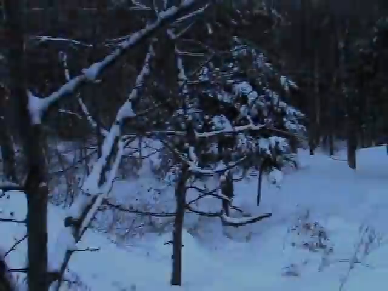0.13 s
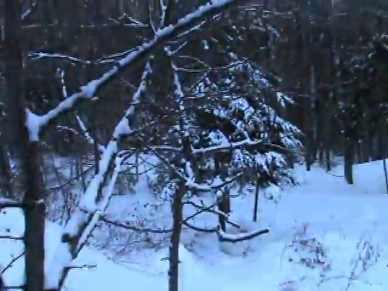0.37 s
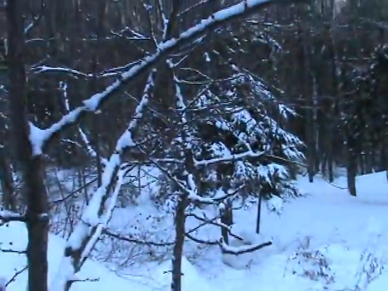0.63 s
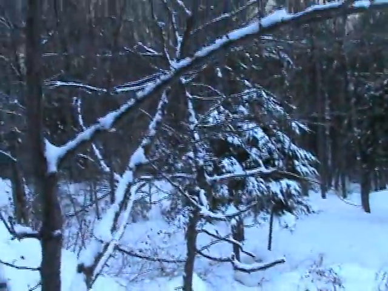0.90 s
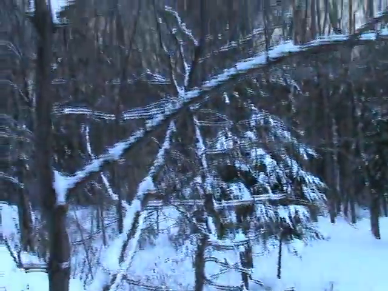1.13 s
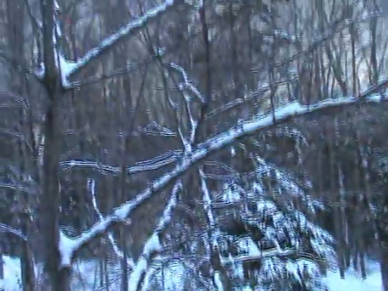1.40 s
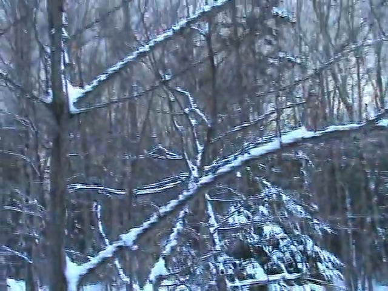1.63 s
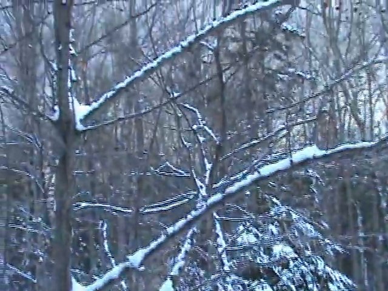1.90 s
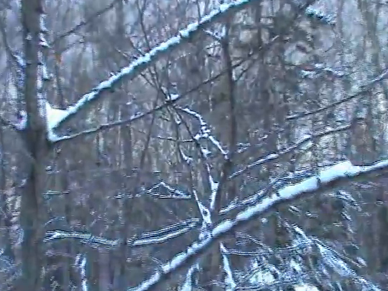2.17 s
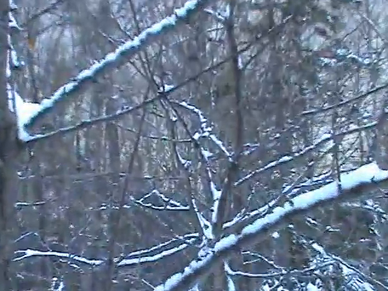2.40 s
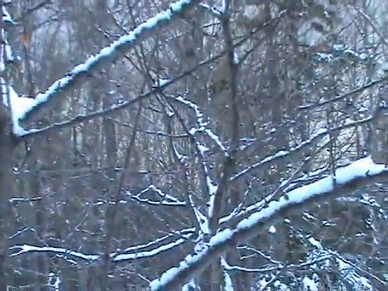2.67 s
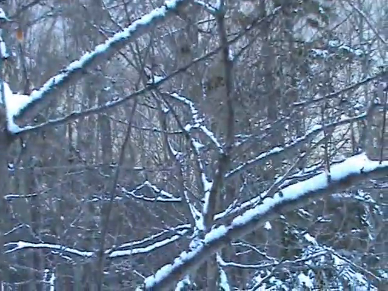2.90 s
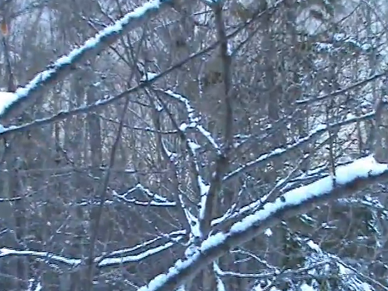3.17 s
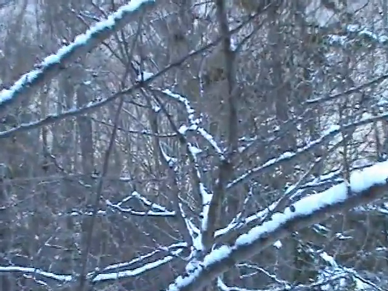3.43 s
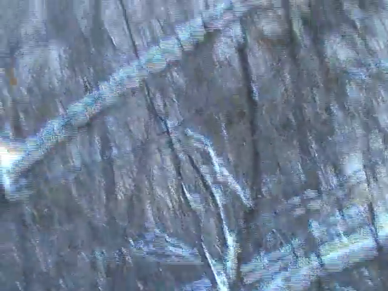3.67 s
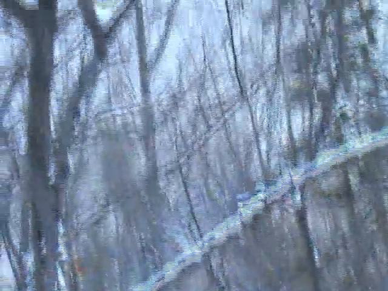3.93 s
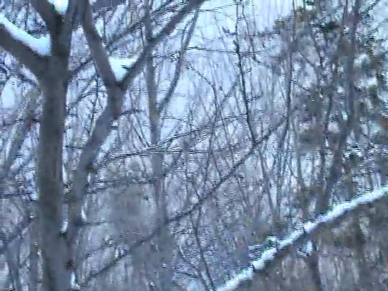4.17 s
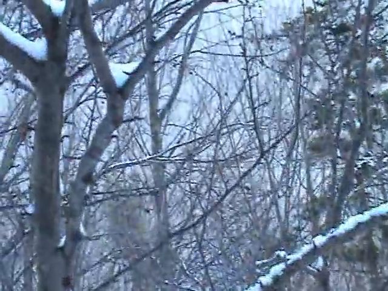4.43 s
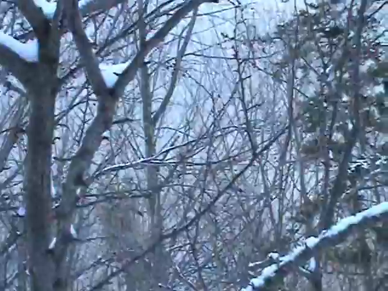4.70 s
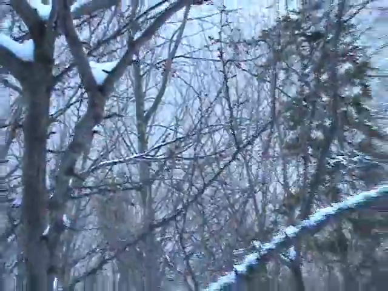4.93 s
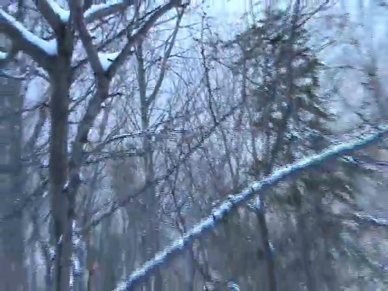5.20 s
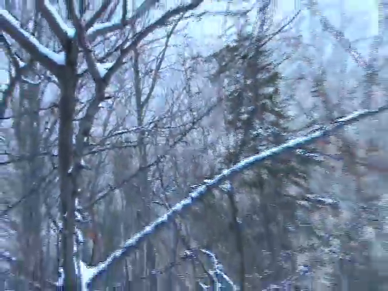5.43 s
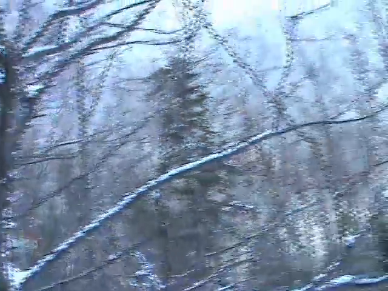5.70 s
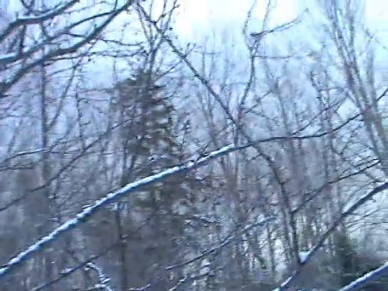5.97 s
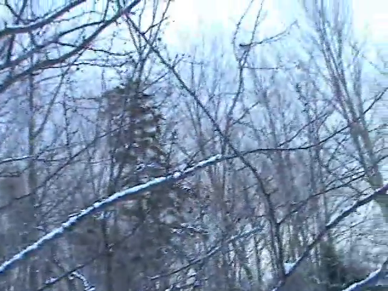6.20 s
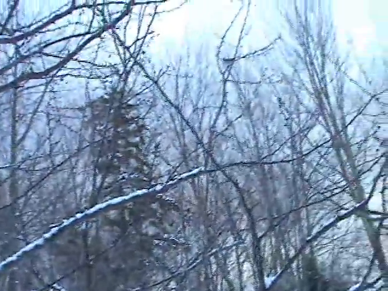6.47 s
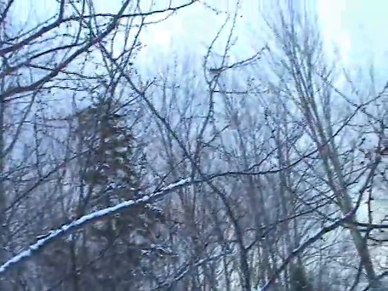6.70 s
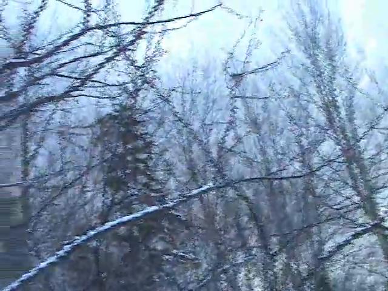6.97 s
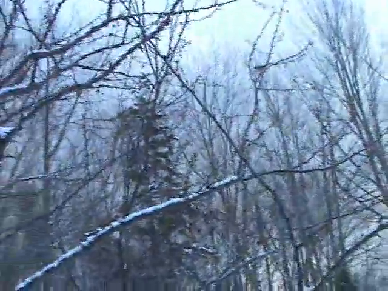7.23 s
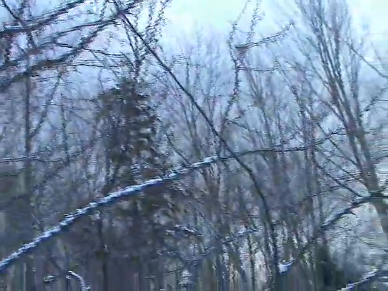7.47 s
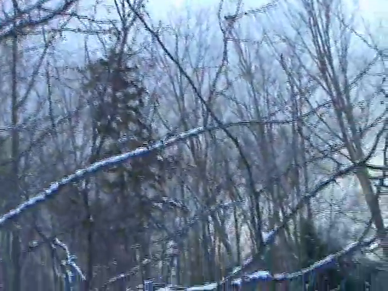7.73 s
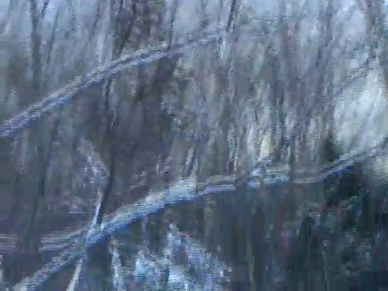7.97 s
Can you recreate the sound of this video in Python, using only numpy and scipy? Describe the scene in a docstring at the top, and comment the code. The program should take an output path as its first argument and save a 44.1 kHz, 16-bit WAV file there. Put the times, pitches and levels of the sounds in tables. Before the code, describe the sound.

A few small songbirds call in open winter woodland with a short, faint scatter of reflections from trees. Their tiny rising chips are mostly faint, some sharp and close, with one raspy phrase near the middle. Right at the microphone, fabric slides, the camera body knocks dully, metal clicks, and plastic ticks, busiest in the first five seconds. Underneath are bassy hand tremble, low outdoor air, a faint steady whine, wavering hum and distant engine drone.

```python
"""Songbirds and a handheld camera in snowy woods

Small birds give rising chips, lower falling notes and one buzzy phrase, all two-voiced: paired oscillators with
mixed tones. Close by, cloth rustles (clumped noise), the camera body knocks and a small metal part clinks
(struck modes), dry ticks snap (noise bursts), and soft bumps and the hand's tremble push the bass about. A far
gliding drone, a wavering hum, steady whines and outdoor air with camera hiss lie underneath."""
import sys
import numpy as np
from scipy import signal
from scipy.fft import rfft, irfft, next_fast_len
from scipy.io import wavfile
from scipy.ndimage import map_coordinates

SR = 44100
rng = np.random.default_rng(int(sys.argv[2]) if len(sys.argv) > 2 else 0)


def bounce(signal):
    """Save signal as a 16-bit WAV file at the path given by the first command-line argument."""
    frames = np.transpose(np.atleast_2d(signal))
    limited = np.clip(frames, -1, 1)
    pcm = np.round(limited * 32767).astype(np.int16)
    wavfile.write(sys.argv[1], SR, pcm)


def voltage_ratio(decibels):
    """Convert decibels (scalar or array-like) to amplitude ratios, 20 dB per decade."""
    exponent = np.asarray(decibels, float) / 20
    return 10 ** exponent


N = 357651  # samples


def unit(x):
    """Normalisation: scales a signal to rms 1."""
    return x / np.sqrt(np.mean(x ** 2) + 1e-20)


def along(points, hz):
    """Logarithmic frequency scale: interpolates (Hz, value) points on it."""
    f, v = np.transpose(points)
    return np.interp(np.log(hz + 1), np.log(f + 1), v)


def curves(rows, t):
    """Linear interpolation: reads each column after the time column at t."""
    s, *columns = np.transpose(rows)
    return [np.interp(t, s, column) for column in columns]


def wobble(rate, size=N):
    """Band-limited random modulation: a smooth curve through rate random knots a second."""
    knots = rng.standard_normal(int(size * rate / SR) + 4)
    return map_coordinates(knots, [np.arange(size) * rate / SR])


def filtered(x, response):
    """Linear filtering: multiplies the spectrum of x by a response of frequency."""
    m = next_fast_len(x.shape[-1] + 8192)
    return irfft(rfft(x, m) * response(np.fft.rfftfreq(m, 1 / SR)), m)[..., :x.shape[-1]]


def resonances(table):
    """Damped resonance: causal response of (Hz, width Hz, dB) resonators summed with alternating sign."""
    def response(f):
        return sum((-1) ** k * voltage_ratio(db) * 1j * f * width / (hz * hz - f * f + 1j * f * width)
                   for k, (hz, width, db) in enumerate(table))
    return response


def add(out, s, x, pan_db):
    """Stereo level difference: places x at time s, left louder than right by pan_db."""
    i = round(s * SR)
    out[:, i:i + len(x)] += (x * voltage_ratio([[pan_db / 2], [-pan_db / 2]]))[:, :N - i]


def phase(hz):
    """Phase is the integral of frequency: running phase of a pitch curve from a random start."""
    return 2 * np.pi * (np.cumsum(hz) / SR + rng.random())


LOW_VOICE_HZ = 3904
# Tones of the two voices together. Each row: multiple of the high pitch, multiple of the low pitch.
MIXES = [(1, 0), (0, 1), (1, -1), (1, 1), (2, 0), (1, 2), (2, -1), (-1, 3), (-1, 4)]


def voices(high, low, levels_db, swell):
    """Nonlinear mixing: both sides of the syrinx sound at once, with sum and difference tones and rasping air."""
    tones = 0
    for k, ((a, b), db) in enumerate(zip(MIXES, levels_db)):
        growth = swell ** (1 + 0.08 * (k > 0))  # all but the high voice grow faster
        tones = tones + voltage_ratio(db) * growth * np.sin(a * high + b * low)
    rasp = voltage_ratio(-23) * swell ** 2 * rng.standard_normal(len(swell))
    return np.sqrt(2) * tones + rasp


CLIMB_S, STEEP_HZ = 0.011, 1390  # time constant of a climb; wider climbs go faster in proportion


def note(length, rise, fall, early, peaked):
    """Exponential glide: a swell, and the pitch shortfall in Hz of a quick climb and last-moment drop."""
    t = np.arange(round(length * SR)) / SR
    flicker = voltage_ratio(1.2 * wobble(150, size=len(t)))
    swell = np.sin(np.pi * (t / length) ** early) ** peaked * flicker
    quaver = 40 * wobble(395, size=len(t))
    climb = rise * np.exp(-t / CLIMB_S * max(rise / STEEP_HZ, 1))
    drop = fall * np.exp((t - length) / 0.00306)
    return swell, climb + drop + quaver


# High rising chips. Each row: start in seconds, length in seconds, top pitch in Hz, rise in Hz,
# level in dB, left-right difference in dB.
CHIPS = [(0.658, 0.042, 7620, 450, -45.5, 1.0868), (1.113, 0.075, 7854, 600, -55.5, -6.7),
         (1.699, .055, 7950, 600, -58, -8.5), (3.261, 0.034, 7700, 900, -47, -.5),
         (3.38, 0.074, 7800, 610, -51, -8), (3.905, 0.056, 7486, 600, -57.5, -.8),
         (4.153, 0.045, 7700, 1110, -43.5, -1.2), (4.522, 0.052, 7520, 400, -56, -1.9),
         (5.187, 0.051, 7800, 800, -46, -1.2), (6.33, 0.056, 8000, 600, -69.5, -5),
         (6.828, 0.047, 7970, 1770, -28, 4.5), (7.364, 0.045, 7630, 700, -61.5, -4.9),
         (8.066, 0.053, 7510, 890, -31.5, 2)]
# Level in dB of each mixed tone in a chip, before the weakening in quiet chips.
CHIP_DB = [-3.5, -43, -17.5, -20.5, -36, -26, -37, -28, -32]
MIX_GROWS, LOUD_CHIP_DB = 0.16, -46  # mixed tones weaken this many dB per dB a chip lies under a loud one
# Lower notes that fall at the end. Each row: start in seconds, top pitch in Hz, level in dB,
# left-right difference in dB.
DUETS = [(5.545, 5890, -56, 3), (6.831, 7400, -43, 3), (6.965, 6530, -39.5, 2), (7.12, 6580, -45, 1),
         (7.918, 5720, -47, -2)]
# Level in dB of each mixed tone in a lower note.
DUET_DB = [0, -36, -17.5, -20, -22.5, -26, -33]
DUET_S, DUET_RISE, FLAT_HZ = 0.046, 0.256, 3500  # length; climb as a share of the top pitch over FLAT_HZ


def calls():
    """Two-source voice: the high voice carries each note, the nearly level low one is heard through mixing."""
    out = np.zeros((2, N))
    for s, length, hz, rise, db, pan in CHIPS:
        peaked = .4 + (rise / 1200) ** 2  # a steeper climb swells more sharply
        swell, short = note(length, rise, fall=60, early=.7, peaked=peaked)
        mixed = np.arange(len(MIXES)) > 0
        levels_db = CHIP_DB + MIX_GROWS * min(db - LOUD_CHIP_DB, 0) * mixed
        high, low = phase(hz - short), phase(LOW_VOICE_HZ - 0.087 * short)
        add(out, s, voltage_ratio(db) * voices(high, low, levels_db, swell), pan)
    for s, hz, db, pan in DUETS:
        fall = 0.92 * (hz - 5500)  # higher notes drop further
        swell, short = note(DUET_S, DUET_RISE * (hz - FLAT_HZ), fall, early=0.98, peaked=0.42)
        high, low = phase(hz - short), phase(LOW_VOICE_HZ - 0.212 * short)
        add(out, s, voltage_ratio(db) * voices(high, low, DUET_DB, swell), pan)
    return out


# Resonances of the throat. Each row: centre in Hz, width in Hz, level in dB.
THROAT = [(3530, 5900, 0.5), (7240, 2300, 4.5), (10800, 2300, -7)]
# Arched notes. Each row: time of the top in seconds, pitch factor, level in dB, time stretch factor.
ARCHES = [(3.54, 1.001, -23, 1.001), (3.628, .92, -26.5, 1.1)]
# Level in dB of each mixed tone in an arched note.
ARCH_DB = [0, -30, -17, -21, -36, -27, -40]
# Inner arch, outer arch and hoarse lead-in. Each row: time from the top in seconds before stretching,
# pitch in Hz before the pitch factor, level in dB relative to the note.
INNER = [(-.01, 3525, -31), (-.006, 5280, -16), (-.002, 6390, -3.5), (.001, 6640, -6), (.004, 4600, -19),
         (.007, 3140, -28), (.012, 2760, -28)]
OUTER = [(-.011, 4170, -15), (-.006, 6870, -7), (-.003, 8120, -12), (.001, 6600, -24), (.005, 6700, -10),
         (.01, 5470, -19), (.015, 4800, -23)]
LEAD = [(-.034, 1910, -12), (-.022, 2190, -19), (-.012, 2300, -12), (-.006, 2500, -17)]


def arches():
    """Frequency modulation: two arched notes with nested pitch curves, a hoarse lead-in and throat air."""
    out = np.zeros((2, N))
    t = np.arange(-.04, .025, 1 / SR)

    def inside(rows, time):
        return (time > rows[0][0]) & (time < rows[-1][0])

    for s, factor, db, stretch in ARCHES:
        time = t / stretch
        hz, level = curves(INNER, time)
        swell = inside(INNER, time) * voltage_ratio(level)
        x = voices(phase(factor * hz), phase(LOW_VOICE_HZ + 0 * t), ARCH_DB, swell)
        hz, level = curves(OUTER, time)
        x += inside(OUTER, time) * voltage_ratio(level) * np.sin(phase(factor * hz))
        x *= 1 + .25 * wobble(2500, size=len(t))  # a hoarse flutter widens the lines
        breath = filtered(rng.standard_normal(len(t)), resonances(THROAT))
        x += voltage_ratio(-19) * np.exp(-(t / 0.035) ** 2) * breath
        hz, level = curves(LEAD, time)
        base = phase(factor * hz * (1 + 0.027 * wobble(955, size=len(t))))
        stack = 0.19 * np.sin(base) + 0.36 * np.sin(2 * base) + np.sin(3 * base) + 0.15 * np.sin(4 * base)
        stack *= 1 + .3 * wobble(1200, size=len(t))
        rasp = filtered(rng.standard_normal(len(t)), resonances(THROAT))
        onset = np.clip((time - LEAD[0][0]) / .008, 0, 1)
        x += onset * inside(LEAD, time) * voltage_ratio(level) * (stack + .9 * rasp)
        add(out, s + t[0], voltage_ratio(db) * x, -.8)
    return out


# Buzz that ends the phrase. Each row: time in seconds, carrier pitch in Hz, level in dB.
BUZZ = [(3.681, 2900, -33), (3.697, 3800, -44.5), (3.75, 3250, -50), (3.762, 3750, -43), (3.776, 3850, -45),
        (3.786, 3050, -50), (3.806, 3200, -45.5), (3.828, 2950, -49), (3.838, 2500, -58)]


def buzz():
    """Sidebands: a carrier with side tones spaced at the beat of both voices, mixed with noise in the throat."""
    out = np.zeros((2, N))
    t = np.arange(BUZZ[0][0], BUZZ[-1][0], 1 / SR)
    hz, level = curves(BUZZ, t)
    carrier = phase(hz)
    beat = phase(480 * (1 + .012 * wobble(90, size=len(t))))
    comb = 0
    for k in range(-3, 17):
        strength_db = 4 * wobble(70, size=len(t)) + 6 * (k in (-1, 0, 6))
        comb = comb + voltage_ratio(strength_db) * np.sin(carrier + k * beat + k * k)
    throat = resonances(THROAT)
    source = unit(comb) + .8 * rng.standard_normal(len(t))
    voiced = unit(filtered(source, lambda f: throat(f) ** 2))
    onset = np.clip((t - t[0]) / 0.019, 0, 1)
    add(out, t[0], onset * voltage_ratio(level) * voiced, -.4)
    return out


def woods(x, t60):
    """Diffuse reverberation: trunks scatter sound back as decaying noise, differently to each side."""
    t = np.arange(SR // 2) / SR
    tail = rng.standard_normal((2, len(t))) * voltage_ratio(-60 * t / t60) * (t > .004)
    return signal.fftconvolve(x, tail / np.linalg.norm(tail[0]), axes=1)[:, :N]


def struck(events, modes, crack, contact, attack):
    """Modal synthesis: each blow, a sharp edge and short scrape, rings modes at new strengths over a crack."""
    out, t = np.zeros((2, N)), np.arange(SR // 16) / SR
    for s, db, pan in events:
        ring = 0
        for (hz, level, t60), more in zip(modes, 2.5 * rng.standard_normal(len(modes))):
            ring = ring + voltage_ratio(level + more - 60 * t / t60) * np.sin(2 * np.pi * hz * t)
        scrape = voltage_ratio(-60 * t / contact) * (4 * (t == 0) + rng.standard_normal(len(t)))
        ring = signal.fftconvolve(ring * (1 - np.exp(-t / attack)), scrape)[:len(t)]
        noise = voltage_ratio(-60 * t / 0.036) * rng.standard_normal(len(t))
        blow = ring / np.abs(ring).max() + crack * noise
        add(out, s, voltage_ratio(db) * blow / np.abs(blow).max(), pan)
    return out


# Camera body knocks. Each row: start in seconds, peak in dB before the bass cut, left-right difference in dB.
KNOCKS = [(2.0602, -46, 0.0), (2.1864, -40, 2), (2.3273, -41, -3), (2.397, -39, 1.0), (2.4906, -23.5, -7),
          (2.8444, -50, -1.0), (3.5006, -18.5, 5), (4.36, -48, -1.5), (4.58, -23, -5), (4.8005, -41, -1.0),
          (4.9307, -32, 5)]
# Modes of the body. Each row: frequency in Hz, mean level in dB, 60 dB decay time in seconds.
BODY = [(1050, -10, .012), (1760, 0, .01), (2150, -2, .009), (3000, -10, .006), (4200, -15, .007),
        (6300, -21, .005)]


def knocks():
    """Impact excitation: short contacts ring the strongly damped modes of the camera body."""
    return struck(KNOCKS, BODY, crack=0.092, contact=0.00042, attack=0.0017)


# Single metal contacts, then hard contacts that chatter three more times. Each row: start in seconds,
# peak in dB before the bass cut, left-right difference in dB.
CLINKS = [(.7355, -27, -2.5), (.759, -36.5, 7), (.763, -32.5, 9), (2.355, -32, 4)]
RATTLES = [(0.7056, -11.5, 7), (0.7149, -10, 6.5)]
CHATTER_S, CHATTER_DB = 0.0027, 4.5  # between rebounds; loss that grows with the square of the count
# Modes of the metal part. Each row: frequency in Hz, mean level in dB, 60 dB decay time in seconds.
METAL = [(2000, -18, .009), (4000, -15, .004), (5930, -3, .006), (8250, -3, .006), (9830, -4, .017),
         (11400, -8, .009), (14000, -11, .006)]


def clinks():
    """Repeated impact: a small metal part rings, and hard contacts rebound with growing loss."""
    contacts = list(CLINKS)
    for s, db, pan in RATTLES:
        for k in range(4):
            contacts.append((s + k * CHATTER_S, db - CHATTER_DB * k ** 2, pan))
    return struck(contacts, METAL, crack=0.16, contact=0.013, attack=.00005)


# Dry ticks of cloth and plastic, and at 0.621 s a tick of the metal part. Each row: start in seconds, # peak in
# dB before the bass cut, centre in Hz, left-right difference in dB.
TICKS = [(0.3203, -42.5, 6700, 5), (.621, -35, 6500, 2), (2.08, -40.5, 3720, 5), (2.1904, -38, 4130, 3),
         (2.29, -35, 10360, -1), (2.385, -33, 7900, 11), (2.4254, -46, 2950, 2), (2.441, -36.5, 8000, 7),
         (2.538, -34, 4915, 5), (2.606, -29, 8100, -0.5), (3.969, -41.5, 6660, 0), (4.2805, -35, 5430, 0),
         (4.4214, -42, 4440, 0.5), (4.4927, -43, 7020, 0.5), (4.6584, -41, 6430, -0.5),
         (4.6684, -37, 4500, -0.5), (4.7354, -34, 4320, -0.5), (4.9307, -37, 6000, 3),
         (5.1437, -45, 7500, 6), (5.7239, -45, 9850, 5), (6.262, -48, 6020, 2), (6.2751, -45, 7220, 4),
         (6.311, -49, 3800, 2), (6.331, -49, 6500, 2), (6.2931, -45, 7910, 3.5), (6.5475, -43.5, 7200, 7),
         (6.604, -44, 7950, 5), (6.645, -35, 7380, 8), (6.6504, -38.5, 6240, -1), (6.8059, -45, 7250, 3.5),
         (6.913, -42, 7584, -1), (7.113, -40, 9000, 3), (7.4794, -37, 7240, 5), (7.4944, -46, 4860, 1),
         (7.5614, -45, 10030, 1.5), (7.5707, -34, 9840, 3), (7.5764, -47.5, 6100, 1.5)]


def ticks():
    """Band-limited transient: a few milliseconds of noise around each tick's own centre."""
    out, t = np.zeros((2, N)), np.arange(SR // 30) / SR
    for s, db, hz, pan in TICKS:
        band = resonances([(hz, .8 * hz, 0)])
        burst = voltage_ratio(-60 * t / 0.009) * rng.standard_normal(len(t))
        snap = filtered(burst, lambda f: band(f) ** 2)
        add(out, s, voltage_ratio(db) * snap / np.abs(snap).max(), pan)
    return out


# Soft bumps on the camera. Each row: start in seconds, level in dB before attack and decay,
# reference pitch in Hz, which sets glide and decay.
BUMPS = [(0.073, -32, 945), (0.552, -27.5, 312), (0.704, -30.5, 288), (2.079, -41, 293), (2.112, -53, 131),
         (2.186, -33, 203), (2.312, -34, 584), (2.326, -58, 136), (2.332, -22.5, 664), (2.391, -27.5, 398),
         (2.527, -30, 307), (2.54, -42, 123), (2.728, -40.5, 134), (3.661, -33.5, 205), (4.353, -39.5, 138),
         (4.429, -30.5, 450), (6.835, -43.5, 115), (8.069, -34.5, 405)]


def bumps():
    """Damped oscillation: a soft push on the camera gives a few low cycles of sinking pitch."""
    out, t = np.zeros((2, N)), np.arange(SR // 6) / SR
    for s, db, hz in BUMPS:
        envelope = voltage_ratio(db - 60 * t * hz / 7) * (1 - np.exp(-t / 0.0016))
        glide = hz * (0.76 + .5 * np.exp(-t / 0.0088))
        add(out, s, envelope * np.sin(phase(glide)), -.5)
    return out


# Cloth spectra: fine fibres, dull folds, middle weave. Each row: frequency in Hz, relative density in dB per Hz.
CLOTH = [(4000, -17), (6800, -4.5), (8330, -6.5), (9300, -5), (11200, -8.5), (15900, -18)]
CLOTH_DULL = [(150, -16), (250, -4.5), (1510, -2), (2220, -5), (3000, -15), (3900, -2), (6600, -120)]
CLOTH_MID = [(1760, -45), (3000, -11.5), (4070, -12.5), (6800, -7), (8840, -13), (15000, -120)]
# The camera shell lifts rubbing noise in bands. Each row: centre in Hz, half width in Hz, lift in dB.
CAVITY = [(1700, 400, 5), (2950, 350, 7), (4800, 700, 6), (8200, 900, 3), (11500, 900, 3)]
# Cloth drawn along, swelling and fading, then cloth that lets go at once and drags after.
# Each row: start in seconds, length in seconds, fine layer's top level in dB, dull layer over it in dB,
# middle layer over it in dB.
SWIPES = [(0.03, 0.19, -67.5, 0, 2.5), (0.455, .21, -44, 3, 3.5), (2.03, 0.32, -68.5, 10.5, 4.5),
          (2.51, 0.25, -53.5, -1, 1.7), (2.73, 0.077, -63, 0, -1.5), (2.82, 0.061, -76.5, 22.5, 9),
          (3.05, 0.086, -73, 13, 7), (3.24, 0.095, -61.5, -1, 4), (3.85, 0.085, -65.5, 8, 5),
          (4.67, 0.12, -60, -0.5, 8.5), (4.88, 0.1, -64, 10, -2), (6.23, 0.26, -67.5, -8, -1),
          (6.57, 0.067, -68, 2.2, 3)]
SLIPS = [(0.722, 0.065, -47.5, -19, -8), (2.285, 0.037, -51, -9, -10), (2.382, 0.088, -46, 2, -4),
         (2.476, 0.11, -46.5, -1, 0), (4.27, 0.19, -59, 4.5, 1.5), (4.658, 0.14, -56.5, 2, 2.5),
         (4.795, .08, -70.5, 8, 8), (4.95, 0.29, -72, 8, 8), (6.64, 0.046, -56.5, -4, -2),
         (8.066, 0.038, -60.5, 9, 3)]
# Side of the rubbing. Each row: time in seconds, left-right difference in dB.
HAND = [(0, 1), (.75, 5), (2.3, 3), (2.6, 1.1), (3.3, 3), (4.3, -1), (5.1, 1), (6.3, 7), (6.7, 4),
        (8.1, -2)]
CRACKLE_PER_S, CRACKLE_DB = 400, -10  # single fibres snapping; level relative to the rub, before colouring
SWIPE_PEAKED, SLIP_ATTACK_S, SLIP_FALL_DB = 3.24, .007, 6.5  # sine power; onset; fall over a slip's length


def rustle():
    """Stick-slip friction: cloth slips in clumps, as noise of grainy level in three scales, with snaps."""
    t, out = np.arange(N) / SR, np.zeros((2, N))
    clumps = voltage_ratio(1.5 * wobble(90) + 1.9 * wobble(500))

    def shell_db(f):
        return sum(db * np.exp(-((f - hz) / width) ** 2) for hz, width, db in CAVITY)

    layers = []
    for colour in (CLOTH, CLOTH_DULL, CLOTH_MID):
        mid, side = unit(clumps * voltage_ratio(1.7 * wobble(150)) * rng.standard_normal((2, N)))
        snaps = (rng.random(N) < CRACKLE_PER_S / SR) * rng.standard_normal(N)
        mid = mid + voltage_ratio(CRACKLE_DB) * unit(snaps)
        stereo = mid + 0.27 * side * [[1], [-1]]
        layers.append(unit(filtered(stereo, lambda f: voltage_ratio(along(colour, f) + shell_db(f)))))
    fine, dull, weave = layers

    def swipe(since, length):
        return np.sin(np.pi * np.clip(since / length, 0, 1)) ** SWIPE_PEAKED

    def slip(since, length):
        gate = np.clip(np.minimum(since / SLIP_ATTACK_S, (length - since) / 0.023 + .5), 0, 1)
        return gate * voltage_ratio(-SLIP_FALL_DB * np.clip(since / length, 0, 2))

    for rows, shape in ((SWIPES, swipe), (SLIPS, slip)):
        for s, length, db, dull_db, weave_db in rows:
            mix = fine + voltage_ratio(dull_db) * dull + voltage_ratio(weave_db) * weave
            out += np.abs(shape(t - s, length)) * voltage_ratio(db) * mix
    return out * voltage_ratio(curves(HAND, t)[0] * [[.5], [-.5]])


# Jerks of the hand. Each row: time of the top in seconds, level in dB.
JERKS = [(2.1, -67), (2.44, -59), (3.68, -72), (4.29, -63.5), (7.68, -68)]
TREMBLE_DB, STILL_DB, SETTLE_S = -72.5, -6, 1.9  # restless floor; its change early on, gone by SETTLE_S
JERK_RISE_S, JERK_T60 = 0.065, 1.04  # seconds


def tremble():
    """Low-frequency random vibration: slow shaking of the hand, a restless floor with jerks that die away."""
    t = np.arange(N) / SR
    level = voltage_ratio(TREMBLE_DB + STILL_DB * np.clip((SETTLE_S - t) / .3, 0, 1) + 0.89 * wobble(6.8))
    for s, db in JERKS:
        rise = np.exp(-(np.minimum(t - s, 0) / JERK_RISE_S) ** 2)
        level += voltage_ratio(db - 60 * np.maximum(t - s, 0) / JERK_T60) * rise
    noise = rng.standard_normal(N) + 0.17 * rng.standard_normal((2, N))  # mostly alike on both sides
    return level * unit(filtered(noise, lambda f: np.abs(resonances([(70, 60, 0)])(f)) ** 2))


# Mean level of the drone's main tone. Each row: time in seconds, level in dB.
DRONE = [(0, -68), (.55, -71.5), (.9, -62), (2.8, -63), (4.2, -66.5), (5.5, -72.5), (5.95, -64.5),
         (8.11, -65)]
DRONE_HZ, DRONE_SINKS_HZ, DRONE_TURN_S, DRONE_GLIDE_S = 132.2, 7.5, 3, 2.2  # mid pitch, half the glide, timing


def drone():
    """Doppler shift: a far engine passes and its order glides down, with tones at 3/2 and double its pitch."""
    t = np.arange(N) / SR
    hz = DRONE_HZ - DRONE_SINKS_HZ * np.tanh((t - DRONE_TURN_S) / DRONE_GLIDE_S) + 0.87 * wobble(3)
    turn = phase(hz / 2)
    engine = np.sin(2 * turn) + 0.44 * np.sin(3 * turn) + 0.28 * np.sin(4 * turn)
    return np.sqrt(2) * voltage_ratio(curves(DRONE, t)[0] + 1.8 * wobble(7.3)) * engine


# Mean level of the hum. Each row: time in seconds, level in dB.
HUM = [(0, -84), (.2, -60), (1.4, -75.5), (2.6, -64), (3.1, -63.5), (3.6, -66.5), (5.9, -66), (6.1, -75),
       (8.11, -86)]
HUM_HZ, HUM_SAG_HZ_PER_S = 472.8, 1.6


def hum():
    """Random frequency and amplitude modulation: one unsteady tone that slowly sags."""
    t = np.arange(N) / SR
    hz = HUM_HZ - HUM_SAG_HZ_PER_S * t + 3 * wobble(2.5) + 4 * wobble(15)
    return np.sqrt(2) * voltage_ratio(curves(HUM, t)[0] + 2.5 * wobble(14)) * np.sin(phase(hz))


# Steady camera tones. Each row: frequency in Hz, level in dB.
WHINE = [(2525, -73.5), (11600, -107)]


def whine():
    """Pure tones: steady sinusoids from the camera."""
    return np.sqrt(2) * sum(voltage_ratio(db) * np.sin(phase(np.full(N, hz))) for hz, db in WHINE)


# Spectrum of the floor. Each row: frequency in Hz, relative density in dB per Hz.
AIR = [(12, -51.5), (20, -29), (93, -13), (126, -8.5), (154, -7.5), (277, -5), (336, -8.5), (470, -9),
       (556, -10.5), (846, -9.5), (1440, -13.5), (1960, -20), (2450, -22.5), (2660, -23), (15900, -30.5)]
AIR_DB = -55  # mean level of the shared part
# Likeness of left and right. Each row: frequency in Hz, correlation from 0 to 1.
ALIKE = [(60, 0.88), (180, 0.96), (550, 0.74), (1650, 0.1), (4970, 0.045), (15000, 0.88)]


def air():
    """Partial coherence: far outdoor noise, nearly alike on both sides in the bass, and the camera's own hiss."""
    def turn(f):
        return np.arccos(np.clip(along(ALIKE, f), 0, 1)) / 2

    def split(f):
        return voltage_ratio(along(AIR, f)) * [np.cos(turn(f)), np.sin(turn(f))]

    mid, side = filtered(rng.standard_normal((2, N)), split)
    stereo = np.array([mid + side, mid - side]) / np.std(mid)
    return voltage_ratio(AIR_DB + 0.16 * wobble(2.44)) * stereo * voltage_ratio([[-.2], [.2]])


def scene():
    """Superposition: birds in the woods, handling close to the microphone, and the floor add linearly."""
    birds = calls() + arches() + buzz()
    near = knocks() + clinks() + ticks()
    near = filtered(near, lambda f: f ** 2 / (f ** 2 + 600 ** 2))  # small parts radiate no bass
    far = voltage_ratio(-17) * woods(birds, t60=.3)
    nearby = voltage_ratio(-24) * woods(near, t60=.12)
    handling = near + nearby + bumps() + rustle() + tremble()
    return birds + far + handling + drone() + hum() + whine() + air()


def band_limit(x):
    """A steep low-pass at the top of the band."""
    return signal.sosfilt(signal.butter(12, 17000, fs=SR, output="sos"), x)


TOP_HZ = 15900


def record(dry):
    """Band limiting: the camera keeps nothing above its band limit."""
    mix = filtered(dry, lambda f: f < TOP_HZ)
    return band_limit(mix)


dry = scene()
out = record(dry)
bounce(out)
```